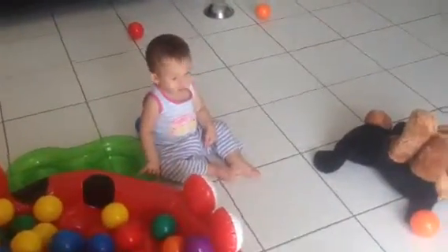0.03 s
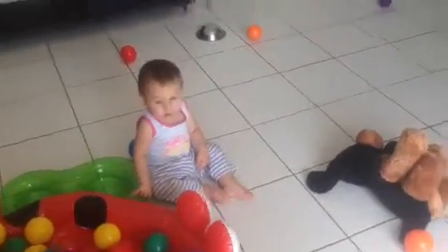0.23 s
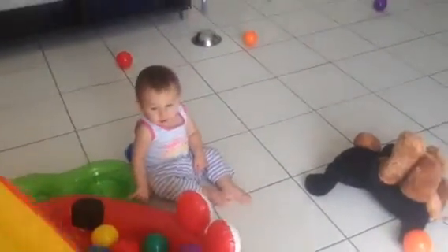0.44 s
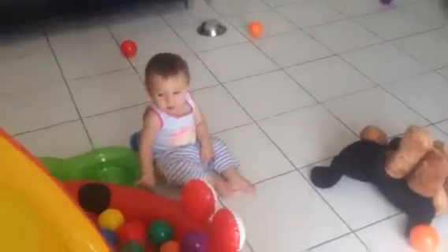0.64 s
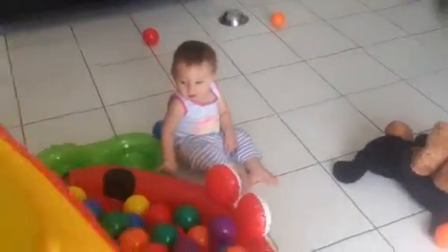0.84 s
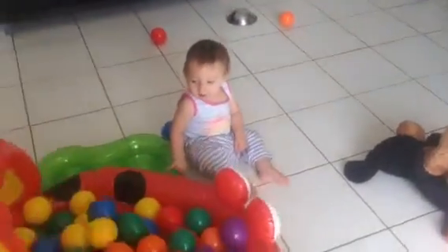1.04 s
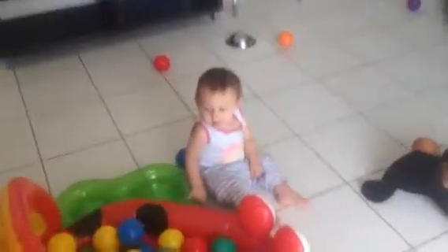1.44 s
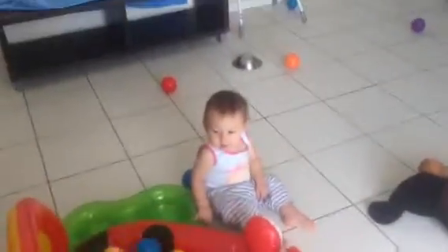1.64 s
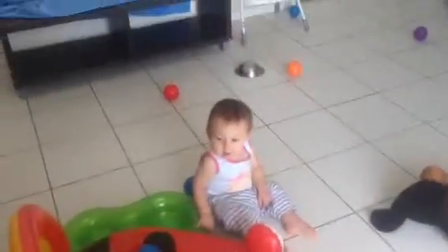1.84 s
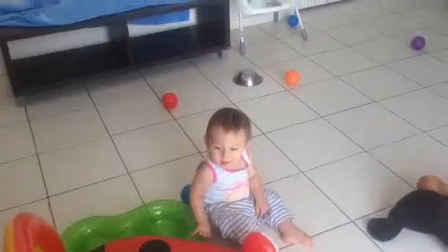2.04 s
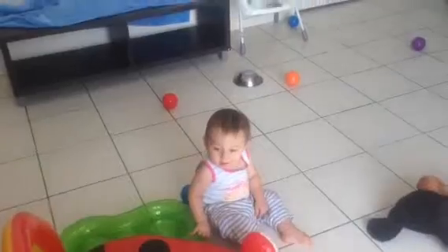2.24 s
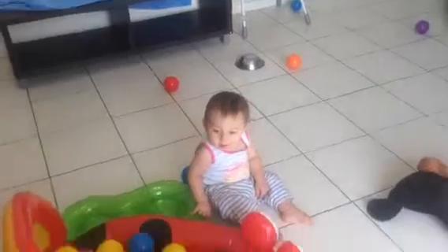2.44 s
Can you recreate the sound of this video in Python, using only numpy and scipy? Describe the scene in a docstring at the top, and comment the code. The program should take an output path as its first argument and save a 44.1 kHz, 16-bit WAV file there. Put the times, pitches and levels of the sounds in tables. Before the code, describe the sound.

Hollow plastic balls are handled close by, rustling and clicking lightly from about 0.2 seconds, with sharper clicks and dull taps near 0.35 and 0.8 seconds. At 1.1 seconds one drops among the others with a hollow knock, the loudest sound, and quickly settles. Soft, low handling bumps follow until about 2 seconds, over a faint low hum and quiet room noise.

```python
"""Hollow plastic balls, handled close by in a quiet tiled room.
Their thin shells click together, rustle by stick-slip and ring dully under taps of the hand.
One drops among the others with a hollow knock and settles.
Low handling bumps sound at the pitch of a faint gliding hum, over faint room noise."""
import sys
import numpy as np
from scipy import signal
from scipy.fft import rfft, irfft
from scipy.io import wavfile
from scipy.ndimage import uniform_filter1d

SR = 44100
rng = np.random.default_rng(int(sys.argv[2]) if len(sys.argv) > 2 else 0)


def waveform_to_disk(signal):
    """Save audio, clipped to [-1, 1], as 16-bit WAV at the path in sys.argv[1]."""
    frames = np.transpose(np.atleast_2d(signal))
    scaled = np.clip(frames, -1, 1) * 32767
    samples = np.round(scaled).astype(np.int16)
    wavfile.write(sys.argv[1], SR, samples)


N = 110250


def undb(db):
    """Decibels to gain."""
    return 10 ** (np.asarray(db) / 20)


def unit(x):
    """Scale to rms 1."""
    return x / np.sqrt(np.mean(x ** 2))


def curve(rows):
    """Linear envelope through (t/s, value) points."""
    return np.interp(np.arange(N) / SR, *np.array(rows).T)


def at_hz(rows, hz):
    """Interpolate (f/Hz, value) points over log frequency."""
    freqs, values = np.array(rows).T
    return np.interp(np.log(np.maximum(hz, 1)), np.log(freqs), values)


def colour(x, spectrum):
    """Filter by (f/Hz, level/dB) points; output rms 1."""
    gain = undb(at_hz(spectrum, np.fft.rfftfreq(N, 1 / SR)))
    return unit(irfft(rfft(x) * gain, N))


def waver(rate_hz):
    """Smooth random drift, rms 1."""
    hold = int(SR / rate_hz)
    steps = np.repeat(rng.standard_normal(N // hold + 1), hold)
    return unit(uniform_filter1d(steps, hold)[:N])


def add(track, start_s, x):
    """Mix x into track at start_s."""
    i = int(start_s * SR)
    track[i:i + len(x)] += x[:N - i]


# Room noise spectrum: f/Hz, level/dB
AIR_SPECTRUM = [(20, -13), (55, 6), (110, 0.5), (200, 0.5), (350, -6), (550, -4), (800, -11), (1600, -10.5),
                (2300, -16), (2900, -19.5), (6000, -23.5), (10000, -25.5), (15000, -25.5)]


def air(level_db=-58, waver_db=1.66):
    """Faint room noise, wavering slightly."""
    noise = colour(rng.standard_normal(N), AIR_SPECTRUM)
    return noise * undb(level_db - waver_db * waver(rate_hz=3.5))


# Hum pitch: t/s, f/Hz
HUM_PITCH_HZ = [(0, 76), (.3, 76.5), (.47, 79), (.68, 80), (.85, 85), (1.05, 85.5), (1.28, 87), (1.38, 90),
                (2.5, 76)]


def hum_tone():
    """Low sine that creeps up in pitch, then sinks."""
    return np.sin(2 * np.pi * np.cumsum(curve(HUM_PITCH_HZ)) / SR)


# Hum envelope: t/s, level/dB
HUM_LEVEL_DB = [(0, -64.5), (.32, -53), (.42, -64), (.52, -65), (.63, -48), (.85, -50.5), (.95, -45),
                (1.02, -49.5), (1.2, -47), (1.39, -52), (1.62, -51.5), (1.7, -51.5), (1.82, -49),
                (2.15, -62), (2.5, -65)]
# Rumble spectrum: f/Hz, level/dB
RUMBLE_SPECTRUM = [(20, -25), (60, -1), (110, 5.5), (160, 3.5), (210, -3.5), (450, -19), (900, -8),
                   (3000, -50)]


def hum(tone, rumble_db=-11, waver_db=1.1):
    """Faint gliding hum with a little rumble; swells and fades."""
    rumble = undb(rumble_db) * colour(rng.standard_normal(N), RUMBLE_SPECTRUM)
    envelope = undb(curve(HUM_LEVEL_DB) + waver_db * waver(rate_hz=23.16))
    return (unit(tone) + rumble) * envelope


# Rubbing envelope: t/s, relative level/dB
RUB_LEVEL_DB = [(0, -103), (.035, -93), (.055, -56.5), (.1, -56), (.16, -84), (.22, -52.5), (.26, -47.5),
                (.32, -50), (.39, -44), (.45, -62), (.59, -61), (.67, -52.5), (.73, -52.5), (.85, -56.5),
                (.99, -49), (1.065, -51.5), (1.1, -37.5), (1.19, -52.5), (1.26, -56), (1.4, -59.5),
                (1.6, -66.5), (1.78, -68), (1.95, -67), (2.3, -66), (2.47, -63)]
# Rubbing spectrum: f/Hz, level/dB
RUB_SPECTRUM = [(60, -47), (200, 3.5), (400, 9), (700, 5), (1300, 4), (2500, 5), (3000, 0), (6000, -5),
                (9000, -10), (15000, -18.5)]


def rubbing(slips_per_s=3500, spread_db=2, gain_db=-1):
    """Plastic sticks and slips under the hand: a dense run of tiny, unequal clicks."""
    slips = rng.random(N) < slips_per_s / SR
    size = undb(-spread_db * np.minimum(rng.exponential(size=N), 5))
    polarity = rng.choice([-1, 1], N)
    return colour(slips * size * polarity, RUB_SPECTRUM) * undb(curve(RUB_LEVEL_DB) + gain_db)


def strikes(events, modes, noise_db, noise_t60_s, highpass_hz, detune=0.025):
    """Detuned modes plus a noise burst; each contact has its own loudness and brightness."""
    t = np.arange(SR // 3) / SR
    direct, send = np.zeros(N), np.zeros(N)
    for start_s, level_db, lowpass_hz, send_db in events:
        stretch = 1 + detune * rng.uniform(-0.78, 1, len(modes))
        ring = np.zeros(len(t))
        for k, (hz, mode_db, t60_s) in enumerate(modes):
            decay = undb(mode_db - 60 * t / t60_s)
            ring += (-1) ** k * decay * np.sin(2 * np.pi * hz * stretch[k] * t)
        burst = undb(noise_db - 60 * t / noise_t60_s) * rng.standard_normal(len(t))
        burst = signal.lfilter(*signal.butter(1, highpass_hz, "high", fs=SR), burst)
        hit = signal.lfilter(*signal.butter(3, lowpass_hz, fs=SR), ring + burst)
        rms_1ms = np.sqrt(np.sum(hit ** 2) / (SR * .001))  # whole energy packed into 1 ms
        hit *= undb(level_db) / rms_1ms
        add(direct, start_s, hit)
        add(send, start_s, hit * undb(send_db))
    return direct, send


# Ball on ball: t/s, level/dB, low-pass/Hz, room send/dB
CLICK_HITS = [(.2352, -33.5, 7160, -0.5), (.248, -42, 10200, -21), (.3387, -37, 7900, 2),
              (.3403, -33.5, 1800, -1), (.3419, -23, 5960, -7.5), (.749, -42, 8000, -4),
              (.7773, -29, 5660, -4.5), (.9745, -43.5, 4900, -23), (1.077, -47, 8800, 11),
              (1.082, -35.5, 4930, -17), (1.496, -54.5, 7100, 6), (1.693, -66.5, 7060, 16.5)]
# Thin shell: f/Hz, level/dB, t60/s
SHELL_MODES = [(666, -5.5, 0.011), (1296, -5.5, 0.015), (1705, -3, 0.014), (2700, -5.5, 0.017),
               (3376, 4, 0.0052), (4400, -1.5, 0.0073), (6150, -5.5, 0.0092), (7240, -3, 0.0043)]


def clicks():
    """Balls collide; their thin shells ring briefly with a crack."""
    return strikes(CLICK_HITS, SHELL_MODES, noise_db=10.5, noise_t60_s=0.0092, highpass_hz=880)


# Handling bumps: t/s, peak level/dB
HANDLING_BUMPS = [(.35, -50), (0.809, -48), (1.073, -33.5), (1.259, -35.5), (1.276, -42), (1.309, -46),
                  (1.435, -48), (1.575, -42.5), (1.739, -44), (1.92, -42.5), (2.264, -61)]


def handling_bumps(tone, rise_s=0.0067):
    """Low handling bumps, voiced as short pulses at the hum's pitch."""
    t = np.arange(SR // 5) / SR
    pulse = t / rise_s * np.exp(1 - t / rise_s)
    envelope = np.zeros(N)
    for start_s, peak_db in HANDLING_BUMPS:
        add(envelope, start_s, undb(peak_db) * pulse)
    return tone * envelope


# Hand on ball: t/s, level/dB, low-pass/Hz, room send/dB
TAP_HITS = [(.356, -36.5, 245, 0.5), (.6425, -31.5, 1770, -6.5), (.7783, -30.5, 680, -9.5),
            (1.004, -39, 610, 7), (1.0755, -26.5, 660, -14), (1.082, -36, 796, 12.5), (1.650, -42, 497, -4)]
# Hand-damped ball: f/Hz, level/dB, t60/s
HELD_MODES = [(157, -9.5, 0.034), (312, -1.5, 0.026), (450, 3, 0.012), (1065, 1.5, 0.01)]


def taps():
    """The hand pats a ball softly and damps its ring."""
    return strikes(TAP_HITS, HELD_MODES, noise_db=16, noise_t60_s=0.0024, highpass_hz=79.5)


# Ball on heap: t/s, level/dB, low-pass/Hz, room send/dB
KNOCK_HITS = [(1.093, -18, 1210, -8), (1.0985, -25.5, 980, 2), (1.108, -43.5, 2980, 12),
              (1.133, -41.5, 2550, 16), (1.152, -31, 1010, -0.5), (1.183, -54, 2210, 11)]
# Hollow heap: f/Hz, level/dB, t60/s
HEAP_MODES = [(164.6, -17.5, 0.13), (334, -33, 0.15), (408.8, -10, 0.069), (607, -23, 0.087),
              (786, -11, 0.081), (990, 0, 0.0099), (1068, -7, 0.04), (1637, -32, 0.1), (2388, -7, 0.028)]


def knocks():
    """A ball thuds onto the hollow heap and settles."""
    return strikes(KNOCK_HITS, HEAP_MODES, noise_db=6, noise_t60_s=0.015, highpass_hz=120)


# Reverberation time: f/Hz, t60/s
ROOM_T60_S = [(100, 0.84), (400, 0.52), (900, 0.59), (2000, 0.9), (5000, 0.61), (12000, 1)]


def room(send, delay_s=0.0026, early_db=6, early_decay_s=0.015, smooth_hz=50, low_cut_hz=90):
    """Strong early reflections off the tiles, then a diffuse tail with its own decay per octave."""
    t, f = np.arange(SR) / SR, np.arange(SR // 2 + 1)
    noise_spectrum = rfft(rng.standard_normal(SR))
    tail = np.zeros(SR)
    for hz in 125 * 2. ** np.arange(8):
        octave = (f >= hz / np.sqrt(2)) & (f < hz * np.sqrt(2))
        tail += irfft(noise_spectrum * octave, SR) * undb(-60 * t / at_hz(ROOM_T60_S, hz))
    early_boost = 1 + undb(early_db) * np.exp(-t / early_decay_s)
    spectrum = rfft(tail * early_boost)
    local_power = uniform_filter1d(np.abs(spectrum) ** 2, size=smooth_hz)
    flattened = irfft(spectrum / np.sqrt(local_power + 1) * (f > low_cut_hz), SR)  # no pitch booms
    response = np.r_[np.zeros(int(delay_s * SR)), flattened[:SR * 3 // 4]]
    return signal.fftconvolve(send, response / np.sqrt(np.sum(response ** 2)))[:N]


def scene(rub_send_db=-6.5):
    """Clicks, taps, knocks and rubbing in the room, over bumps, hum and air."""
    click, click_send = clicks()
    tap, tap_send = taps()
    knock, knock_send = knocks()
    rub = rubbing()
    reverb = room(click_send + tap_send + knock_send + undb(rub_send_db) * rub)
    tone = hum_tone()
    return (click + tap + knock + rub + reverb + handling_bumps(tone) + hum(tone) + air())[None]


def record(dry):
    """Steep low-pass on the top treble."""
    cutoff_hz = 15400
    return signal.sosfilt(signal.ellip(10, .1, 70, cutoff_hz, fs=SR, output="sos"), dry)


dry = scene()
out = record(dry)
waveform_to_disk(out)
```